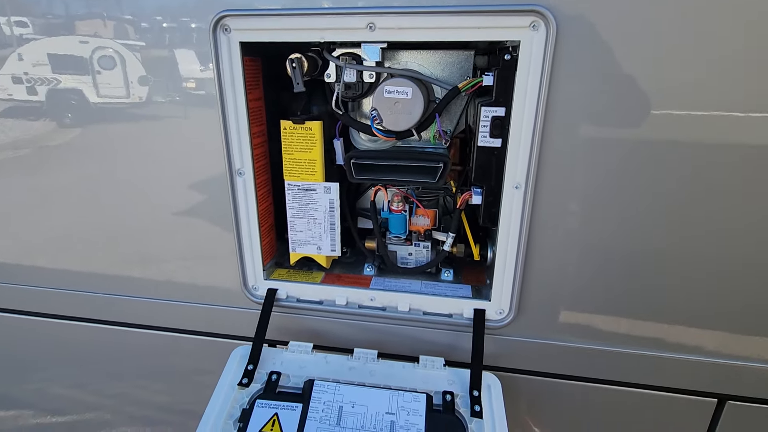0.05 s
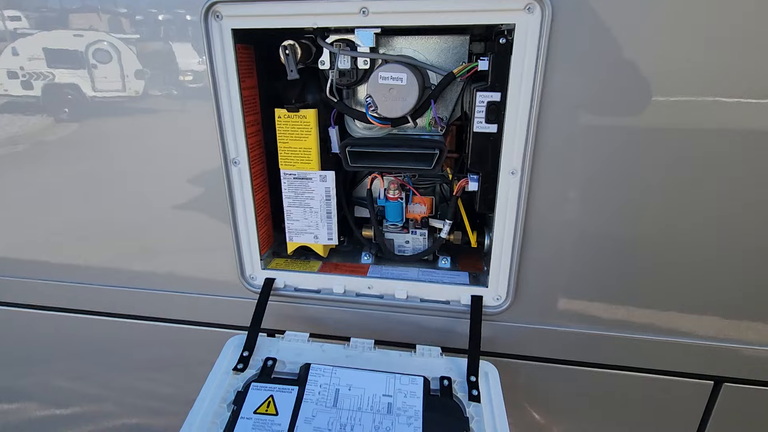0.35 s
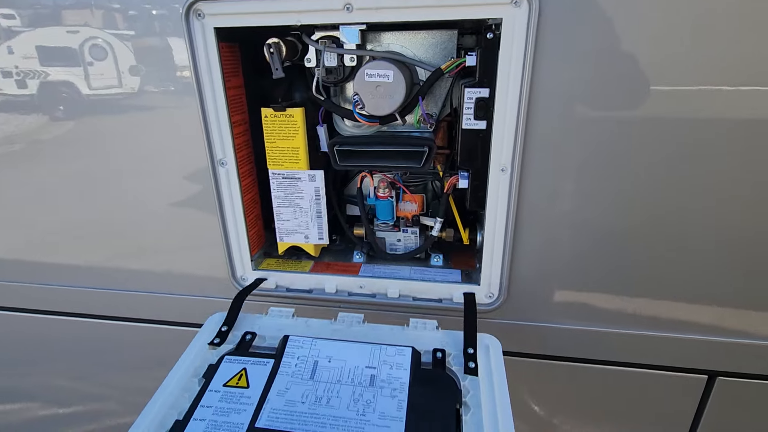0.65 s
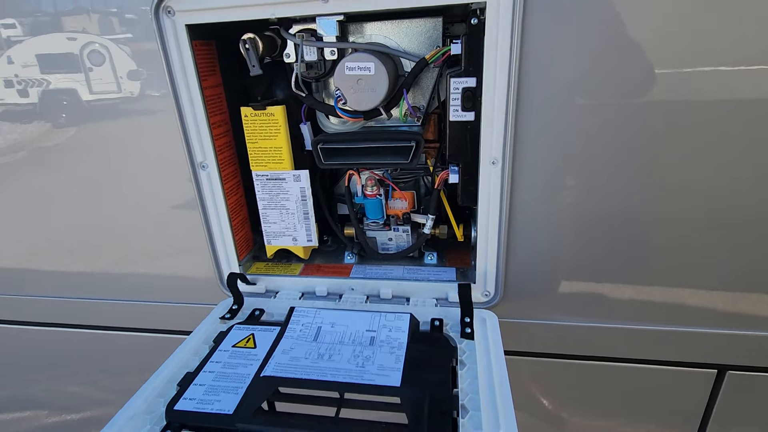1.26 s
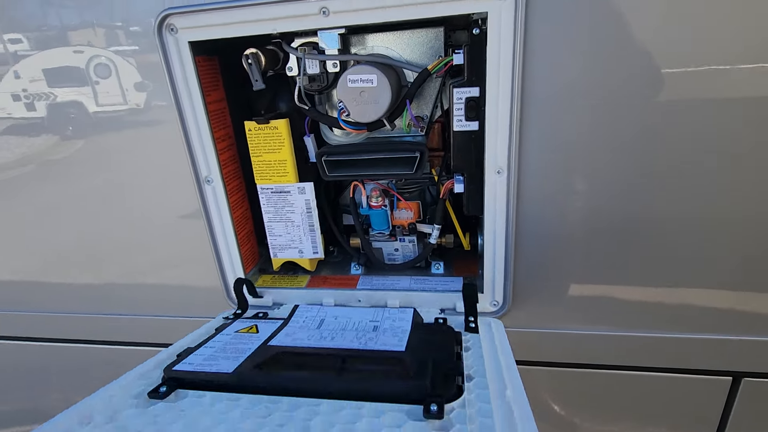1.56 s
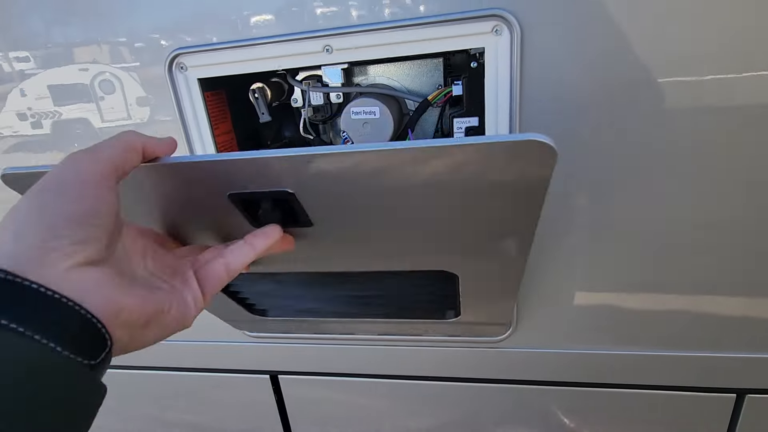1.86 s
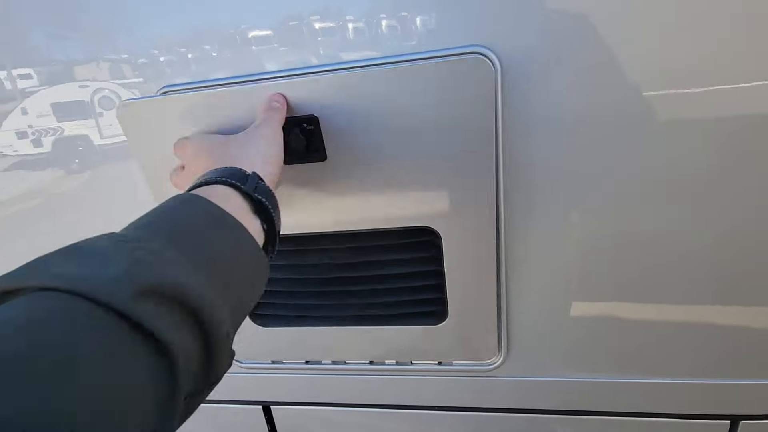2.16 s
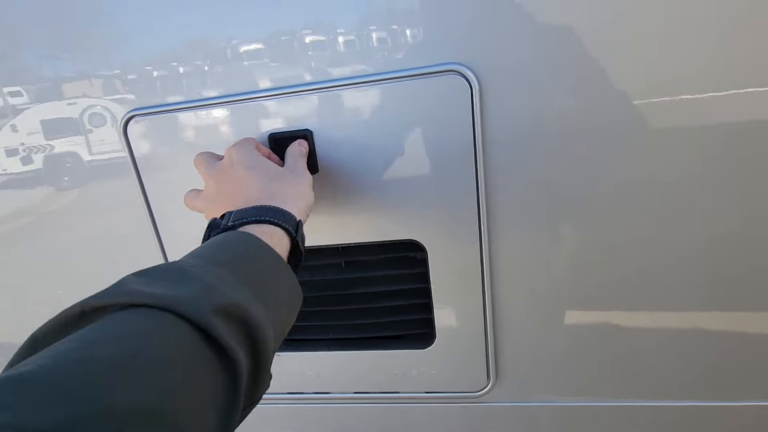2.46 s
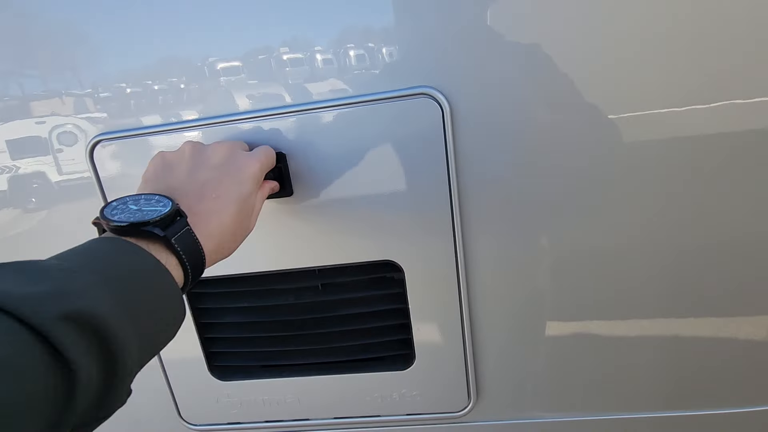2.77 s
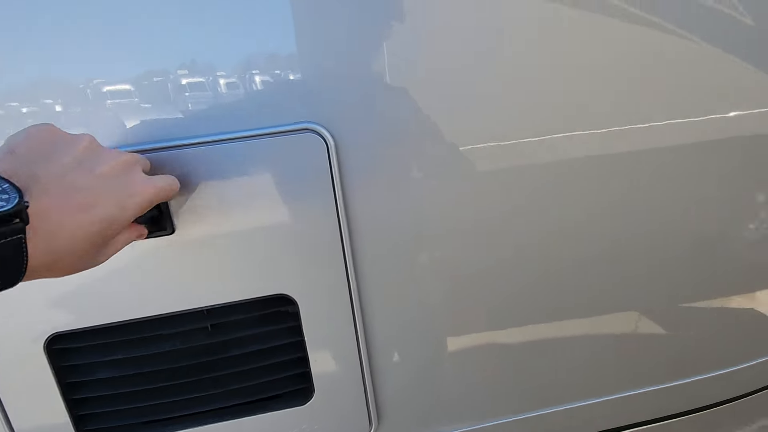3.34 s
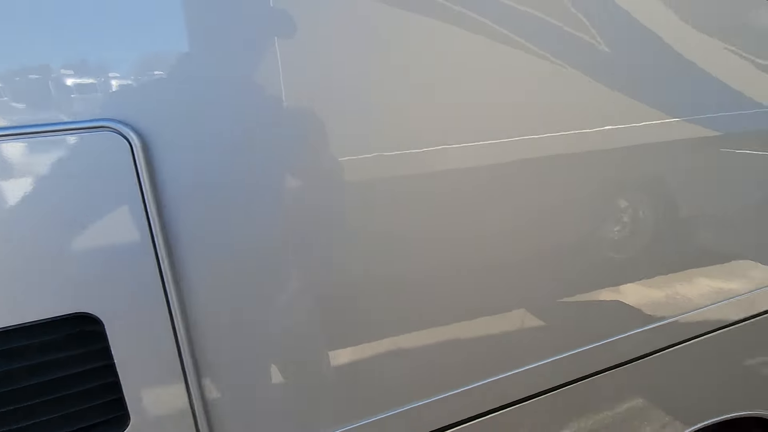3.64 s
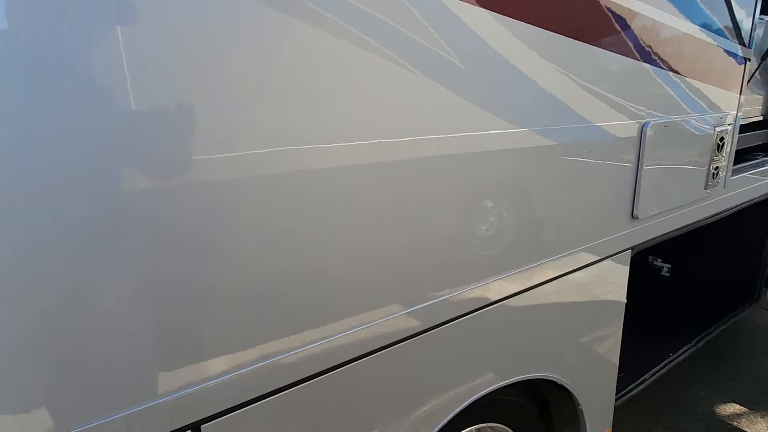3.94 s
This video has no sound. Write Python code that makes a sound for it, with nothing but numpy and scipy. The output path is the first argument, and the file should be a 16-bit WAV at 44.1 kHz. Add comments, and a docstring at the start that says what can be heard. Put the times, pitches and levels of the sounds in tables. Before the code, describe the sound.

Close by, a motorhome's metal hatch is closed: hinges and straps click, a hand brushes the panel, and the latch scrapes and clacks home. Outdoor wind rumbles on the microphone throughout, with a far traffic-like roar behind.

```python
"""A motorhome's metal compartment door is swung up and shut, outdoors, heard close up.
Wind rumbles throughout over a distant traffic-like roar and a hiss; a faint whistle sinks in the first
second. From 1 s hinges and straps click and rub as the door rises, and a hand slides over the panel.
Near 2.3 s the catch meets the frame, scrapes over it and snaps home in a quick run of clacks that ring
the panel. Light handling follows, with one far chirp at 3.4 s."""
import sys
import numpy as np
from scipy import signal
from scipy.fft import rfft, irfft, next_fast_len
from scipy.io import wavfile
from scipy.ndimage import map_coordinates

SR = 44100
rng = np.random.default_rng(int(sys.argv[2]) if len(sys.argv) > 2 else 0)


def dump_mix(stems):
    """Bounce the given channels to the path in sys.argv[1] as a 16-bit WAV at rate SR."""
    frames = np.atleast_2d(stems).T  # one column per channel
    limited = np.clip(frames, -1, 1)  # hard clip at full scale
    pcm = np.round(limited * 32767).astype(np.int16)
    wavfile.write(sys.argv[1], SR, pcm)


N = 176400

# blows on the frame (time [s], level [dB], tilt [dB/octave], crack t60 [s], panel ring [dB])
CLACKS = [(2.2805, -16, 6.5, 0.032, -38), (2.3965, -12, 0.5, .025, -24), (2.3992, -5, 1, 0.021, -19),
          (2.404, -10.5, 1.5, 0.017, -25), (2.4075, -1, 3, 0.012, -19), (2.4122, -18, 1, 0.016, -29),
          (2.4167, -13.5, 0.5, 0.028, -27)]
# crack of a blow (frequency [Hz], level [dB])
CLACK_SPECTRUM = [(120, 6), (350, 5), (700, 3.5), (1350, 4.5), (2100, -2.5), (2700, -9.5), (3400, -2.5),
                  (4200, -2), (5000, -1), (5800, -11), (6900, -9.5), (7800, -5.5), (9300, -26),
                  (11000, -32.5), (12000, -21), (13800, -31), (15700, -41.5)]
# panel and catch resonances (frequency [Hz], level [dB], t60 [s])
DOOR_MODES = [(172, -0.5, .12), (348, -2.5, 0.17), (582, -5, .1), (1065, -15.5, .06), (1220, -3.5, 0.072),
              (1475, -11.5, 0.11), (1770, -22, 0.07), (1910, -9, 0.1), (2300, -15.5, 0.11),
              (3440, -14, .06), (4080, -11, .055), (4640, -12, 0.045), (4660, -14, .03), (6900, -20, 0.036)]
# catch sliding on the frame (time [s], level [dB])
SCRAPE_ENVELOPE = [(2.255, -58.5), (2.277, -28), (2.298, -29), (2.312, -22), (2.33, -21), (2.342, -21.5),
                   (2.358, -26), (2.38, -37), (2.394, -25), (2.41, -56)]
# its rasp (frequency [Hz], level [dB])
SCRAPE_SPECTRUM = [(120, 2.5), (400, 4.5), (750, 2.5), (1200, -5), (1700, 4), (2100, 3), (2700, -7),
                   (4700, -14), (6000, -14), (8500, -17.5), (10000, -36), (12000, -35.5), (14000, -39.5),
                   (15700, -49.5)]
# its stick-slip jumps (time [s], level [dB])
CATCH_JUMPS = [(2.3107, -30.5), (2.315, -29.5), (2.322, -22.5), (2.3274, -25.5), (2.3314, -25.5),
               (2.34, -31), (2.3462, -30.5)]
# panel flexing (frequency [Hz], level [dB])
FLEX_SPECTRUM = [(40, -19.5), (90, 0), (150, -1.5), (240, -18), (600, -47.5)]
# hinge, strap and handle contacts (time [s], level [dB], tilt [dB/octave], liner knock [dB])
CLICKS = [(1.061, -37.5, -4, -44), (1.1415, -25.5, 6.5, -33), (1.1454, -32, 5, -27),
          (1.168, -40.5, 3.5, -41), (1.1853, -31, -2.5, -32), (1.2171, -22.5, -3, -26),
          (1.2212, -29.5, 1.5, -30.5), (1.246, -36, 1, -44), (1.3518, -41.5, 5, -50),
          (1.3602, -31.5, 9, -33), (1.3619, -29.5, -2, -31), (1.388, -43, -1.5, -34),
          (1.4042, -35.5, 3.5, -43), (1.46, -48, 4, -32), (1.5687, -27, -1.5, -30), (1.572, -34.5, -1, -33),
          (1.6308, -41.5, 1, -44), (2.079, -35, -2.5, -48), (2.081, -37.5, 12, -34.5),
          (2.2653, -38.5, 0.5, -41), (2.384, -26, -0.5, -37), (2.4835, -38.5, 5.5, -47),
          (2.883, -45, 5.5, -77)]
# one click (frequency [Hz], level [dB])
CLICK_SPECTRUM = [(300, 6.5), (900, -3.5), (2000, 2), (2800, -7.5), (3600, -7), (4500, -1.5), (5300, -2.5),
                  (6400, -9), (8400, -10.5), (9900, -33.5), (12300, -26), (14000, -32), (15700, -35)]
# knock of the plastic liner (frequency [Hz], level [dB])
LINER_SPECTRUM = [(300, -6), (900, -4.5), (1450, 1.5), (1750, -1.5), (2080, 1), (2600, -15), (3500, -15),
                  (6000, -21), (10000, -53)]
# hinge pin tinks (time [s], level [dB])
PIN_TINKS = [(1.143, -24), (1.206, -37), (1.238, -35), (1.2432, -30), (1.267, -45), (1.389, -36),
             (1.488, -36.5)]
# hinge pin resonances (frequency [Hz], level [dB], t60 [s])
PIN_MODES = [(5300, 0, .018), (5900, -5, .007)]
# strap, hand and sleeve strokes (centre [s], length [s], level [dB], tilt [dB/octave])
RUBS = [(0.161, 0.061, -55.5, -2.5), (1.259, 0.1, -51.5, -0.5), (1.378, 0.1, -41.5, -3),
        (1.478, 0.04, -44, -4), (1.626, 0.14, -48.5, -5.5), (1.788, 0.25, -54.5, -1),
        (1.805, 0.054, -55, 6), (2.14, 0.33, -65.5, 4), (2.671, 0.07, -61.5, 3), (2.92, 0.38, -61, 1),
        (3.463, 0.15, -65, 5), (3.585, .045, -56, 1.5)]
# one stroke (frequency [Hz], level [dB])
RUB_SPECTRUM = [(500, -12), (1800, 8), (3200, -9), (5300, 1.5), (6300, -5.5), (7000, -0.5), (8100, -0.5),
                (8800, -6), (9900, -23), (12500, -10.5), (14000, -14.5), (15700, -18.5)]
# hand sliding on the panel (time [s], level [dB])
SLIDE_ENVELOPE = [(1.82, -64), (1.855, -51), (1.9, -49.5), (1.935, -67.5)]
# its swish (frequency [Hz], level [dB])
SLIDE_SPECTRUM = [(1500, -2.5), (3000, -9), (5700, -7.5), (6550, 2.5), (7100, -2), (7850, 4), (8500, -8),
                  (9700, -16.5), (12500, -11), (15700, -24)]
# left-right likeness of door noise (frequency [Hz], correlation [0-1])
DOOR_CORRELATION = [(300, 1), (900, 0.57), (2500, 0.065), (8000, .05)]
# compartment decay (frequency [Hz], t60 [s])
CAVITY_T60 = [(200, 0.5), (2000, 0.26), (4500, 0.15), (8000, 0.15), (14000, 0.18)]
# background swells (time [s], wind rumble [dB], distant roar [dB])
AIR_ENVELOPES = [(0, -22.5, -29.5), (1, -23, -27.5), (1.7, -23.5, -27.5), (2.1, -22.5, -27),
                 (2.35, -24.5, -25.5), (2.6, -22.5, -27), (3.2, -21.5, -26), (3.97, -22.5, -25.5)]
# wind rumble (frequency [Hz], level [dB])
RUMBLE_SPECTRUM = [(15, -35), (28, -12.5), (45, -0.5), (62, -1.5), (76, 5), (88, -4.5), (100, -4.5),
                   (113, -1.5), (127, 2.5), (145, -7), (190, -5.5), (265, -12.5), (330, -8), (470, -22.5),
                   (800, -44.5), (2000, -87)]
# distant roar (frequency [Hz], level [dB])
ROAR_SPECTRUM = [(150, -18.5), (350, -7), (490, -5), (600, -1.5), (720, 1), (880, -1.5), (1050, -6.5),
                 (1250, -10), (1600, -15.5), (2200, -25), (3100, -35.5), (4700, -46), (7800, -50.5),
                 (9500, -68.5), (12300, -74), (16000, -68.5)]
# roar band that grows most in a swell (frequency [Hz], share [0-1])
ROAR_SWELL_BAND = [(760, 0), (960, 1), (1800, 0.3), (3200, 0)]
# left-right likeness of wind and roar (frequency [Hz], correlation [0-1])
AIR_CORRELATION = [(60, 0.99), (250, 1), (600, 0.8), (1400, 0.56), (3500, 0), (9000, 0.45)]
# balance of wind and roar (frequency [Hz], left minus right [dB])
AIR_PAN = [(60, -0.4), (200, 0.5), (430, 2), (900, -0.2), (1700, -2.5), (3300, 5.5), (7000, -3.5)]
# outdoor hiss (frequency [Hz], level [dB])
HISS_SPECTRUM = [(1500, -22.5), (3000, -11), (4500, 1.5), (6200, -6), (7800, -6.5), (9500, -29),
                 (16000, -36.5)]
# thin whistle (time [s], level [dB])
WHISTLE_ENVELOPE = [(0, -91), (.36, -89), (.45, -94), (.55, -84), (.69, -83), (.75, -96), (.86, -86),
                    (1.0, -102)]
# far chirp (time [s], pitch [Hz], level [dB])
CHIRP_CONTOUR = [(3.395, 3340, -71.5), (3.42, 3335, -53), (3.455, 3340, -60), (3.47, 3350, -66),
                 (3.49, 3320, -64), (3.54, 3360, -74)]


def door_clacks():
    """Each blow on the frame cracks and rings the panel."""
    out = np.zeros((2, N))
    for time_s, db, tilt_db, t60_s, ring_db in CLACKS:
        blow = amp(db) * crack(CLACK_SPECTRUM, tilt_db, t60_s)
        add(out, time_s, cavity(blow + amp(ring_db) * ring(DOOR_MODES)))
    return out * pan(db=-0.5)


def catch_scrape():
    """The catch grinds over the frame in small jumps; the panel flexes as it is pressed in."""
    level_db, = curves(SCRAPE_ENVELOPE)
    slips = friction(N, slips_per_s=600, grain_db=2.5) * amp(level_db) * during(SCRAPE_ENVELOPE)
    rasp = coloured(slips, SCRAPE_SPECTRUM)
    for time_s, db in CATCH_JUMPS:
        add(rasp, time_s, amp(db) * crack(CLICK_SPECTRUM, tilt_db=5, t60_s=0.016))
    flex = coloured(slips, FLEX_SPECTRUM)
    return rasp * pan(db=-2) + flex


def hinge_clicks():
    """Hinges, straps and handle click and knock the plastic liner; the hinge pin tinks."""
    out = np.zeros((2, N))
    for time_s, db, tilt_db, liner_db in CLICKS:
        click = amp(db) * crack(CLICK_SPECTRUM, tilt_db, t60_s=0.024)
        knock = amp(liner_db) * crack(LINER_SPECTRUM, tilt_db=0, t60_s=0.054)
        add(out, time_s, cavity(click + knock))
    for time_s, db in PIN_TINKS:
        add(out, time_s, amp(db) * ring(PIN_MODES))
    return out * pan(db=-3.5)


def rubbing(lead_s=0.15):
    """Straps, hand and sleeve rub in soft, grainy swells."""
    out = np.zeros((2, N))
    from_centre_s = np.arange(SR // 2) / SR - lead_s
    for centre_s, length_s, db, tilt_db in RUBS:
        swell = np.cos(np.pi * np.clip(from_centre_s / length_s, -0.5, 0.5))
        slips = friction(len(swell), slips_per_s=150, grain_db=1.5) * swell
        add(out, max(centre_s - lead_s, 0), amp(db) * coloured(slips, RUB_SPECTRUM, tilt_db))
    return out * pan(db=0.5)


def hand_slide():
    """Friction of the hand on the panel: one bright swish."""
    level_db, = curves(SLIDE_ENVELOPE)
    slips = friction(N, slips_per_s=300, grain_db=2) * amp(level_db) * during(SLIDE_ENVELOPE)
    return coloured(slips, SLIDE_SPECTRUM)


def crack(spectrum, tilt_db, t60_s):
    """One contact: a decaying noise burst."""
    fade = amp(-60 * np.arange(SR // 4) / SR / t60_s)
    burst = coloured(noise_pair(len(fade), DOOR_CORRELATION) * fade, spectrum, tilt_db)
    return unit_rms(burst) * np.sqrt(np.mean(fade ** 2))


def ring(modes, pitch_scatter=0.006, attack_s=0.0003):
    """Struck modes, varied per hit; higher ones reach the ears out of phase."""
    t = np.arange(SR // 4) / SR
    out = np.zeros((2, len(t)))
    for hz, db, t60_s in modes:
        phase_rad = rng.standard_normal((2, 1)) * min(hz / 1500, 3)
        pitch_hz = hz * (1 + pitch_scatter * rng.standard_normal())
        fade = amp(db + rng.normal(0, 2) - 60 * t / t60_s)
        out += fade * np.sin(2 * np.pi * pitch_hz * t + phase_rad)
    return out * (1 - np.exp(-t / attack_s))


def friction(n, slips_per_s, grain_db):
    """Noise broken into tiny slips of uneven strength."""
    grains = np.interp(np.arange(n) * slips_per_s / SR, np.arange(8192), rng.standard_normal(8192))
    return unit_rms(noise_pair(n, DOOR_CORRELATION) * amp(grain_db * grains))


def cavity(x, wet_db=-15):
    """Direct sound plus the short reverberation of compartment and wall."""
    hz, t, bins = signal.stft(rng.standard_normal((2, SR // 4)), SR, nperseg=256)
    fade = amp(-60 * t / along(CAVITY_T60, hz)[:, None])
    _, tail = signal.istft(bins * fade, SR, nperseg=256)
    wet = signal.fftconvolve(x, tail / np.linalg.norm(tail[0]), axes=1)[:, :x.shape[1]]
    return x + amp(wet_db) * wet


def wind_and_roar(left_lag_s=0.00034):
    """Wind rumble and a distant roar that brightens as it swells; both reach the right ear first."""
    rumble_db, roar_db = curves(AIR_ENVELOPES)
    rumble = shaped(noise_pair(N, AIR_CORRELATION), RUMBLE_SPECTRUM)
    rumble *= amp(rumble_db + 0.33 * wobble(rate_hz=5.7))
    roar = shaped(noise_pair(N, AIR_CORRELATION), ROAR_SPECTRUM)
    roar *= amp(roar_db + 0.33 * wobble(rate_hz=2.1))
    treble = filtered(roar, lambda hz: along(ROAR_SWELL_BAND, hz))
    roar += treble * (amp(roar_db - roar_db.mean()) - 1)
    delay_s = np.array([[0.5], [-0.5]]) * left_lag_s
    return filtered(rumble + roar, lambda hz: pan(along(AIR_PAN, hz)) * np.exp(-2j * np.pi * hz * delay_s))


def hiss(level_db=-62.5):
    """Steady outdoor hiss, independent in each ear."""
    return amp(level_db) * shaped(rng.standard_normal((2, N)), HISS_SPECTRUM)


def whistle(start_hz=11480, sag_hz_per_s=500):
    """A faint, slowly sinking tone."""
    level_db, = curves(WHISTLE_ENVELOPE)
    pitch_hz = start_hz - sag_hz_per_s * np.arange(N) / SR
    return thin_tone(pitch_hz, level_db, waver_hz=45) * during(WHISTLE_ENVELOPE)


def far_chirp(flutter_db=3):
    """One short, fluttering tone."""
    pitch_hz, level_db = curves(CHIRP_CONTOUR)
    tone = thin_tone(pitch_hz, level_db, waver_hz=24.6)
    return tone * amp(flutter_db * wobble(rate_hz=98)) * during(CHIRP_CONTOUR)


def thin_tone(hz, rms_db, waver_hz):
    """Sine of unsteady pitch."""
    cycles = np.cumsum(hz + waver_hz * wobble(rate_hz=150)) / SR
    return np.sqrt(2) * amp(rms_db) * np.sin(2 * np.pi * cycles)


def noise_pair(n, correlation):
    """Stereo white noise with the given left-right correlation."""
    def mid_side_gains(hz):
        angle_rad = np.arccos(np.clip(along(correlation, hz), -1, 1)) / 2
        return np.array([np.cos(angle_rad), np.sin(angle_rad)])
    mid, side = filtered(rng.standard_normal((2, n)), mid_side_gains)
    return np.array([mid + side, mid - side])


def coloured(x, spectrum, tilt_db=0, taps=2048):
    """Minimum-phase filter of unit energy; tilt_db per octave above 500 Hz."""
    hz = np.fft.rfftfreq(taps, 1 / SR)
    gain_db = along(spectrum, hz) + tilt_db * np.log2(np.maximum(hz, 500))
    cepstrum = irfft(np.log(amp(gain_db)))
    cepstrum[1:taps // 2] *= 2
    cepstrum[taps // 2 + 1:] = 0
    kernel = irfft(np.exp(rfft(cepstrum)))
    return signal.fftconvolve(x, kernel[None] / np.linalg.norm(kernel), axes=1)[:, :x.shape[1]]


def shaped(noise, spectrum):
    """Noise with the given spectrum, at rms 1."""
    return unit_rms(filtered(noise, lambda hz: amp(along(spectrum, hz))))


def filtered(x, response):
    """FFT filter with gain response(hz)."""
    n = x.shape[-1]
    padded = next_fast_len(n + 4096)
    return irfft(rfft(x, padded) * response(np.fft.rfftfreq(padded, 1 / SR)), padded)[..., :n]


def along(points, hz):
    """Table lookup on a log frequency axis."""
    knots_hz, values = np.transpose(points)
    return np.interp(np.log(hz + 1), np.log(knots_hz + 1), values)


def curves(rows):
    """Per-sample curve for each column after time."""
    times_s, *columns = np.transpose(rows)
    return [np.interp(np.arange(N) / SR, times_s, column) for column in columns]


def during(rows):
    """Gate from a table's first time to its last."""
    t = np.arange(N) / SR
    return (t >= rows[0][0]) & (t <= rows[-1][0])


def wobble(rate_hz):
    """Smooth random curve."""
    return map_coordinates(rng.standard_normal(4096), [np.arange(N) * rate_hz / SR], mode="wrap")


def amp(db):
    """Decibels to gain."""
    return 10 ** (np.asarray(db) / 20)


def unit_rms(x):
    """Scale to rms 1."""
    return x / np.sqrt(np.mean(x ** 2) + 1e-20)


def pan(db):
    """Stereo gains for a left-minus-right level."""
    return amp(np.array([[0.5], [-0.5]]) * db)


def add(track, time_s, sound):
    """Mix a sound into the track."""
    part = track[:, round(time_s * SR):][:, :sound.shape[1]]
    part += sound[:, :part.shape[1]]


def scene():
    """The door in front of the outdoor background."""
    door = hinge_clicks() + cavity(rubbing() + hand_slide() + catch_scrape()) + door_clacks()
    return door + wind_and_roar() + hiss() + whistle() + far_chirp()


def record(dry):
    """Soft clip, then band limit."""
    ceiling, cutoff_hz = 0.88, 15750
    clipped = dry / (1 + np.abs(dry / ceiling) ** 6) ** (1 / 6)
    return filtered(clipped, lambda hz: hz < cutoff_hz)


dry = scene()
out = record(dry)
dump_mix(out)
```